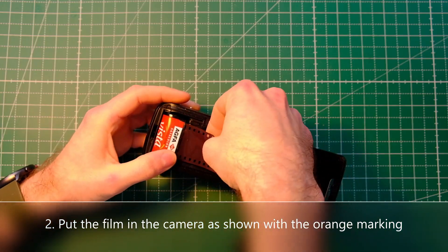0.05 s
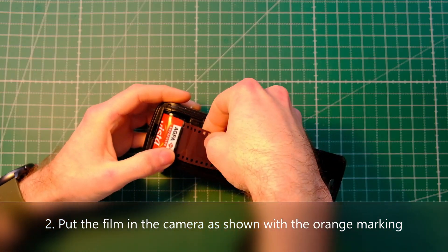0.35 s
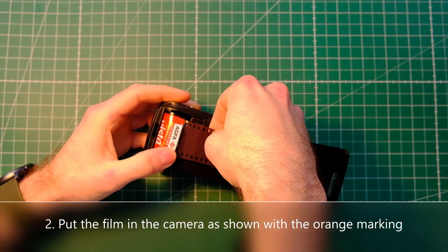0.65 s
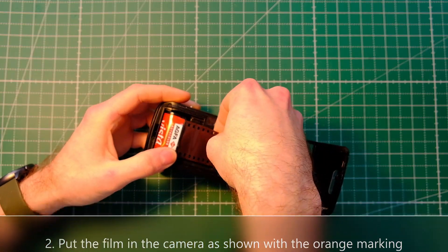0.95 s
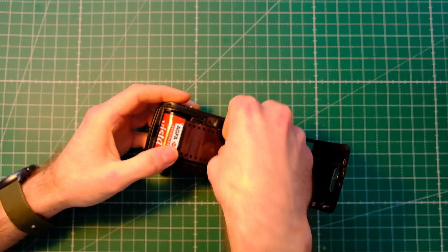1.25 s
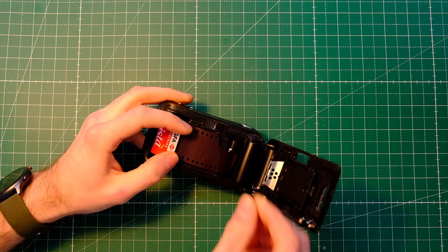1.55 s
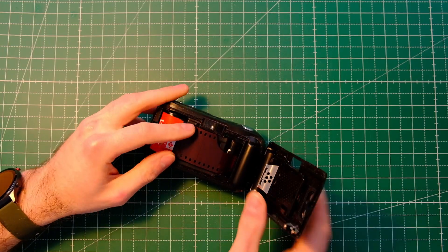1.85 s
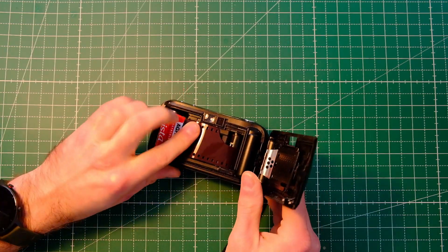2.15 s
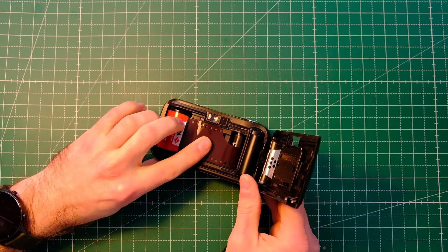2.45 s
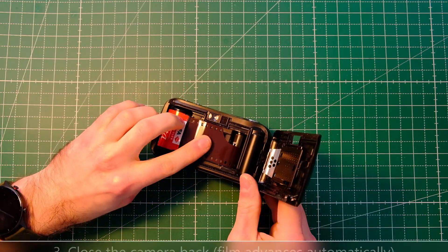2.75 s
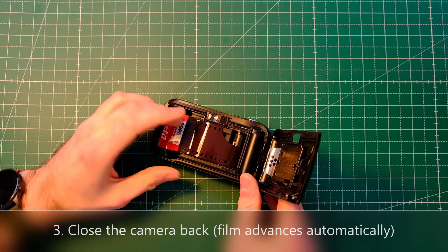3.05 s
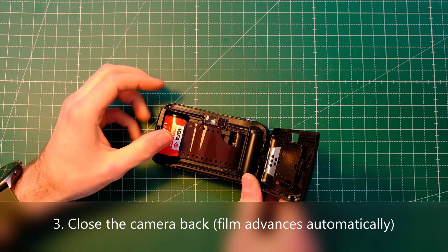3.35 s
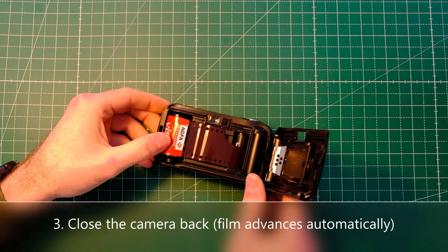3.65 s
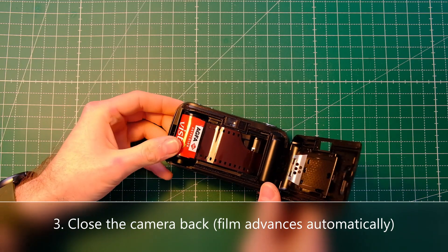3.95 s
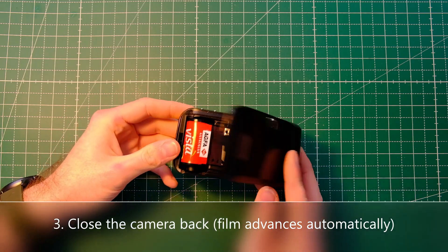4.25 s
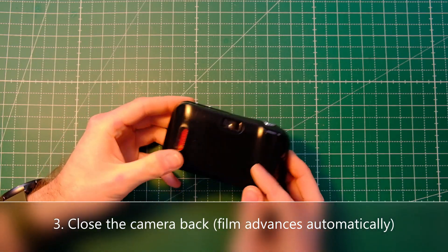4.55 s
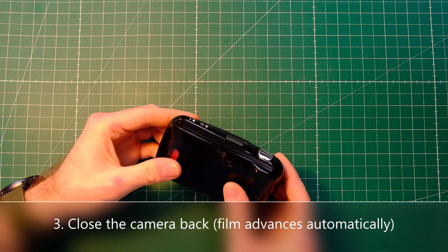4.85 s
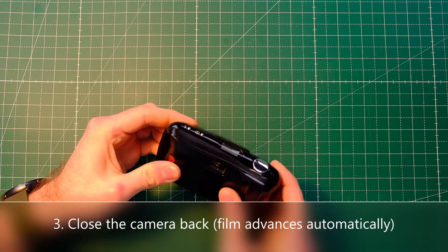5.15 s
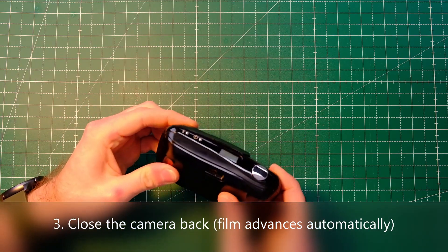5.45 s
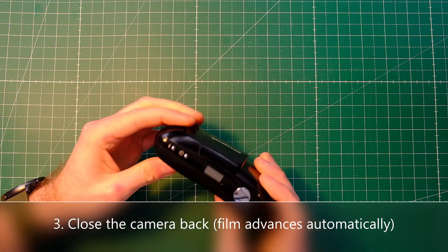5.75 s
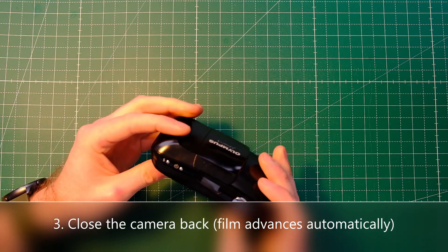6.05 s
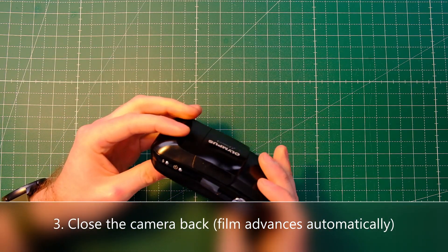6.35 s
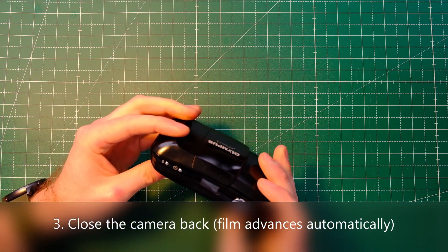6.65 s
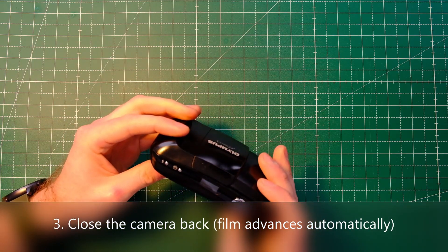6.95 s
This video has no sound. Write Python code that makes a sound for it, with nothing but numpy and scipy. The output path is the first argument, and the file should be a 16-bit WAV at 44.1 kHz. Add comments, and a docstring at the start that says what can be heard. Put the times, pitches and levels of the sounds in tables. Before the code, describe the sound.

Plastic rubs and clicks as film is loaded into a compact camera, then the back snaps shut and a small motor whirs.

```python
"""Over the low rush of a bare room, skin and film rub on plastic and the film clicks into a compact camera.
The body drags, bumps and knocks on a cutting mat, the back swings over and its latch snaps shut.
Sliding friction gives noise; each impact excites damped modes of the shell. A small geared motor then
winds the film on, halts for a moment and runs again, whining at harmonics of its shaft speed while
its meshing teeth rasp. The room reverberates with it all."""
import sys
import numpy as np
from scipy import signal
from scipy.fft import rfft, irfft
from scipy.io import wavfile
from scipy.ndimage import uniform_filter1d

SR = 44100
rng = np.random.default_rng(int(sys.argv[2]) if len(sys.argv) > 2 else 0)


def wav_record(signal):
    """Record a signal, one row per channel, as 16-bit PCM in the file named by sys.argv[1]."""
    frames = np.transpose(np.atleast_2d(signal))
    bounded = np.clip(frames, -1, 1)
    # unit amplitude maps onto the largest positive 16-bit level
    quanta = np.round(bounded * 32767).astype(np.int16)
    wavfile.write(sys.argv[1], SR, quanta)


N = 312669
TIME = np.arange(N) / SR


def amp(db):
    """Amplitude ratio of a level in decibels."""
    return 10 ** (np.asarray(db) / 20)


def unit(x):
    """Normalisation to rms 1."""
    return x / np.sqrt(np.mean(x ** 2) + 1e-20)


def read(points, hz):
    """Interpolation of a table on a log-frequency axis."""
    f, value = np.transpose(points)
    return np.interp(np.log(hz + 1), np.log(f), value)


def add(mix, s, sound):
    """Superposition: a sound joins the mix at time s."""
    part = mix[..., round(s * SR):][..., :sound.shape[-1]]
    part += sound[..., :part.shape[-1]]


def ramp(start, length):
    """Linear rise from 0 to 1 over length seconds."""
    return np.clip((TIME - start) / length, 0, 1)


def decay(t, t60):
    """Exponential damping: 60 dB in t60 seconds."""
    return amp(-60 * t / t60)


def pan(db):
    """Interaural level difference, left minus right, as two gains."""
    return amp([[db / 2], [-db / 2]])


def colour(x, db_at, size=2048):
    """Minimum-phase filter with a gain of db_at(frequency) decibels."""
    log_gain = np.log(amp(db_at(abs(np.fft.fftfreq(size, 1 / SR)))))
    taps = np.fft.ifft(np.exp(np.conj(signal.hilbert(log_gain)))).real
    return signal.oaconvolve(x, taps[(None,) * (x.ndim - 1)], axes=-1)[..., :x.shape[-1]]


def shelves(hz, bass_db, treble_db, bass_hz=650, treble_hz=3200):
    """Spectral tilt in dB: heavy blows add bass, hard edges add treble."""
    return bass_db / (1 + (hz / bass_hz) ** 4) + treble_db * (1 - 1 / (1 + (hz / treble_hz) ** 3))


# Likeness of diffuse sound at left and right: (frequency [Hz], coherence [0-1])
COHERENCE = [(40, 0.35), (150, 0.14), (400, 0.33), (1200, 0.52), (3000, 0.41), (8000, 0.14), (14000, 0.22)]

def diffuse_noise(count):
    """A diffuse field is only partly coherent between two nearby points."""
    a, b = rfft(rng.standard_normal((2, count)))
    coherence = read(COHERENCE, np.fft.rfftfreq(count, 1 / SR))
    mid, side = a * np.sqrt((1 + coherence) / 2), b * np.sqrt((1 - coherence) / 2)
    return irfft(np.array([mid + side, mid - side]), count)


# Background spectrum of the room: (frequency [Hz], level [dB])
AIR = [(15, -51), (25, -20.5), (97, -5), (130, -6), (236, -3.5), (394, -5.5), (503, -10), (545, -7),
       (840, -11), (911, -12), (1100, -13), (1560, -16.5), (3250, -23.5), (16000, -44)]

def room_tone(level_db=-49.5):
    """Stationary broadband noise: a low rush with faint hiss."""
    rush = unit(colour(diffuse_noise(N), lambda f: read(AIR, f), size=8192))
    return amp(level_db) * rush * pan(-0.56)


def friction(length, spectrum, treble_db=0, grain_db=3.5):
    """Sliding friction: many tiny slips of uneven size under a swelling stroke."""
    count = int(length * SR)
    sizes = amp(grain_db * np.repeat(rng.standard_normal(SR // 64), 64)[:count])
    slips = diffuse_noise(SR)[:, :count] * sizes
    return unit(colour(slips, lambda f: read(spectrum, f) + shelves(f, 0, treble_db))) * np.hanning(count)


# Response of the plastic shell: (frequency [Hz], level [dB])
SHELL = [(60, -20), (250, -18.5), (470, 0.5), (750, -2), (1300, 1), (2100, 3.5), (3300, 0.5), (5000, -7.5),
         (8000, -17), (12000, -26.5), (16000, -37)]
# Strokes over the shell, and one brief clack of the winding drive at 6 s: (midpoint [s], duration [s], level
# [dB], treble [dB])
RUBS = [(0.02, 0.068, -48.5, 4), (0.303, 0.047, -40.5, 1), (.63, .045, -43, 9), (0.794, 0.056, -52, 7),
        (0.909, 0.054, -50, -4), (1.172, 0.028, -36, -4), (1.554, 0.092, -49.5, -12), (1.943, 0.13, -55, 7),
        (2.073, 0.23, -48, -4), (2.462, .035, -45.5, -12), (3.088, .16, -58.5, 2), (3.508, 0.15, -62, 21),
        (4.292, 0.079, -48.5, 7), (4.395, 0.011, -25, -2), (5.995, .014, -29.5, 4)]

def rubs():
    """Friction of skin and film on plastic, filtered by the shell, and one brief clack of the winding drive at
    6 s."""
    mix = np.zeros((2, N))
    for s, length, db, treble_db in RUBS:
        add(mix, max(s - length / 2, 0), amp(db) * friction(length, SHELL, treble_db))
    return mix


def strike(db_at, chatter_t60, first_db, chatter_db, wide_hz=3800):
    """Impact: an impulse and brief chatter, filtered by the struck object; the treble spreads in space."""
    t = np.arange(SR // 8) / SR
    mid, side = rng.standard_normal((2, len(t))) * decay(t, chatter_t60)
    side = signal.lfilter(*signal.butter(1, wide_hz, "high", fs=SR), side)
    contact = unit(colour(1. * (t == 0), db_at))
    chatter = unit(colour(np.array([mid + side, mid - side]), db_at))
    return unit(amp(first_db) * contact + amp(chatter_db) * chatter)


def ring(blow, modes):
    """Modal response: a blow excites damped sinusoids (frequency [Hz], level [dB], T60 [s])."""
    t = np.arange(blow.shape[1]) / SR
    response = sum(amp(db) * decay(t, t60) * np.cos(2 * np.pi * hz * t) for hz, db, t60 in modes)
    return unit(signal.fftconvolve(blow.mean(0), response)[:len(t)])


def radiate(source, events, room_db=-7, directions=3):
    """Directivity: blows differ with direction. Returns the direct sound and the paths into the room."""
    direct, paths = np.zeros((2, N)), np.zeros((directions, N))
    for s, db, *shape in events:
        add(direct, s, amp(db) * source(*shape))
        for path in paths:
            add(path, s, amp(db + room_db) * unit(source(*shape)[0]) / np.sqrt(directions))
    return direct, paths


# Modes of the camera body: (frequency [Hz], level [dB], T60 [s])
BODY_MODES = [(471, -14, 0.053), (1010, -6, 0.011), (1320, 2.5, 0.022), (1814, -3, 0.04), (2072, -1, 0.02),
              (2400, -19, 0.032), (3100, -10, 0.039), (3400, 3, 0.0036), (4310, 3, 0.01),
              (5220, 5.5, 0.011), (7350, -2, 0.013)]

def click(bass_db, treble_db, ring_hz, ring_db, chatter_t60, ring_t60=0.018, body_db=-5):
    """A hard impact excites the shell, the body's modes and the resonance of the struck part."""
    blow = strike(lambda f: read(SHELL, f), chatter_t60, first_db=-11.5, chatter_db=-3.5)
    blow = blow + amp(body_db) * ring(blow, BODY_MODES)
    blow = unit(colour(blow, lambda f: shelves(f, bass_db, treble_db)))
    return unit(blow + amp(ring_db) * ring(blow, [(ring_hz, 0, ring_t60)]))


# Hard contacts: (time [s], level [dB], bass [dB], treble [dB], ring [Hz], ring [dB], chatter T60 [s])
CLICKS = [(.1425, -47.5, -21, -4.5, 2050, -11, 0.099), (0.2179, -34.5, 1, -7.5, 1340, -14, 0.019),
          (0.2758, -47, -4, -8, 1330, -13, 0.016), (.3652, -35, 3, -7.5, 2150, -22, .028),
          (.3880, -37.5, 4, 20, 3400, 9, 0.019), (.3903, -31, -8, 15, 1230, -7.5, .011),
          (.5270, -52.5, -11, 11, 3400, 1, 0.023), (1.1770, -33, 3.5, 13.5, 3100, -9, .016),
          (1.1790, -29.5, -2, -1, 1860, 4, .022), (1.632, -52.5, 26, 1, 1410, 2, 0.019),
          (1.700, -51, 6, 2, 1270, -1, 0.055), (1.7202, -44.5, 11, 8, 2030, -36, 0.11),
          (2.112, -35.5, -12, -14, 3020, -6, 0.016), (2.477, -53.5, -1, -11, 1270, 0, 0.032),
          (2.8750, -65, -9, 7, 3100, -16, 0.053), (4.3965, -37.5, 19, 2, 1330, 13, 0.062),
          (4.8190, -55, 10, -7, 860, -3, .025), (5.0234, -49.5, 4, -2.5, 2400, -9, 0.011),
          (6.642, -45.5, -3, -28, 2055, -3, 0.05), (7.018, -41.5, -17, -4, 2030, 15, 0.018)]

def clicks():
    """Impacts of plastic on plastic radiate as short transients."""
    return radiate(click, CLICKS)


# Spectrum of the body sliding on the mat: (frequency [Hz], level [dB])
DRAG_TONE = [(100, -34), (450, -22), (700, 1), (950, 0), (1400, -11.5), (2500, -25.5), (8000, -34.5)]
# Slides on the mat: (midpoint [s], duration [s], level [dB])
DRAGS = [(0.591, 0.057, -49.5), (1.61, 0.2, -52.5), (1.888, .14, -49), (3.497, .14, -48.5),
         (5.988, 0.055, -40.5)]

def drags():
    """Friction of the body on the mat gives a band of midrange noise."""
    mix = np.zeros((2, N))
    for s, length, db in DRAGS:
        add(mix, s - length / 2, amp(db) * friction(length, DRAG_TONE))
    return mix


# Fingers and body meeting the mat: (time [s], level [dB], frequency [Hz])
BUMPS = [(0.769, -56, 735), (.8925, -61, 920), (1.5126, -54, 856), (3.3032, -53.5, 754),
         (5.0495, -56.5, 430)]

def bumps(t60=0.035, puff_db=2):
    """A cushioned impact excites one low, heavily damped mode and a dull puff."""
    mix = np.zeros((2, N))
    t = np.arange(SR // 8) / SR
    band = signal.butter(2, [130, 1300], "band", fs=SR)
    for s, db, hz in BUMPS:
        puff = amp(puff_db) * unit(signal.lfilter(*band, diffuse_noise(len(t))))
        mode = np.sin(2 * np.pi * hz * t)
        add(mix, s, amp(db) * unit(decay(t, t60) * (mode + puff)))
    return mix


# Response of the hollow body: (frequency [Hz], level [dB])
HOLLOW = [(60, -5), (150, -3.5), (320, -1.5), (500, -7), (750, -6.5), (1000, -8), (1350, -5), (2000, -8),
          (2600, -16), (3700, -14), (7000, -27), (15000, -36.5)]

def knock(cutoff_hz, treble_db, ring_hz, ring_db, chatter_t60, ring_t60=0.013):
    """Impact on a hollow body: the heavier it lands, the lower its spectrum reaches."""
    def spectrum(f):
        bass_loss_db = 10 * np.log10(1 + (cutoff_hz / (f + 10)) ** 4)
        return read(HOLLOW, f) + shelves(f, 0, treble_db) - bass_loss_db
    blow = strike(spectrum, chatter_t60, first_db=0, chatter_db=-1)
    return unit(blow + amp(ring_db) * ring(blow, [(ring_hz, 0, ring_t60)]))


# Dull blows: (time [s], level [dB], low cutoff [Hz], treble [dB], ring [Hz], ring [dB], chatter T60 [s])
KNOCKS = [(2.1122, -26.5, 130, -8.5, 890, -2, 0.013), (4.3985, -25.5, 282, 1.5, 624, -5, .036),
          (4.638, -34.5, 607, -3, 860, 7, 0.058), (4.684, -45.5, 610, -14, 970, 11, .02)]

def knocks():
    """Impact and rebound: the body knocks on the mat, then the back lands on it and bounces."""
    return radiate(knock, KNOCKS)


def latch(time_s=5.1065, level_db=-24, drop_s=0.00127, hit_db=-3):
    """Double impact: the hook hits its catch, then drops home and sets its spring ringing."""
    def snap():
        hit = amp(hit_db) * click(bass_db=-8, treble_db=-6.5, ring_hz=1120, ring_db=-21, chatter_t60=0.011)
        home = click(bass_db=3.5, treble_db=16, ring_hz=1539, ring_db=-9.5, chatter_t60=0.011, ring_t60=0.15)
        add(hit, drop_s, home)
        return unit(hit)
    return radiate(snap, [(time_s, level_db)], room_db=-2.5)


# Runs of the motor: (start [s], stop [s], time for the gears to engage [s])
RUNS = [(5.201, 6.527, 0.25), (6.63, 7.2, 0.035)]
# Running speed of the shaft, one list per run: (time [s], speed [turns/s])
SPEEDS = [
    [(5.42, 182.4), (5.516, 178.9), (5.75, 177.6), (5.802, 180.7), (6.032, 180.3), (6.102, 184.5),
     (6.222, 186.0), (6.244, 184.0), (6.5, 188.4)],
    [(6.8, 183.3), (6.816, 184.1), (7.05, 187.4)],
]

def drive(spin_up_s=0.033, grind_s=0.017, halt_s=0.00402):
    """First-order spin-up, then a grinding halt: speed [turns/s], engagement [0-1], grinding [0-1]."""
    speed, engaged, grinding = np.zeros((3, N))
    for (start, stop, engage_s), running in zip(RUNS, SPEEDS):
        on = 1 - ramp(stop, halt_s)
        spin_up = 1 - np.exp(-np.maximum(TIME - start, 0) / spin_up_s)
        speed += on * spin_up * np.interp(TIME, *np.transpose(running))
        engaged += on * ramp(start, engage_s)
        grinding += on * ramp(stop - grind_s, halt_s)
    return speed, engaged, grinding


def by_load(load, free_db, loaded_db):
    """Gain interpolated in decibels between free running and full load."""
    return amp(free_db + load * (loaded_db - free_db))


# Shaft harmonics: (order [per turn], relative level running free [dB], relative level loaded [dB])
WHINE = [(3, -21, -24), (5, -22, -19), (6, -18, -11.5), (7, -20, -29), (8, -26, -24), (9, -14.5, -13.5),
         (10, -18, -15), (11, -19, -10), (12, -20.5, -17), (13, -17, -22), (17, -48, -13)]

def shaft_whine(angle, load, swell_db=3.5, swells_per_s=14):
    """Periodic rotation gives harmonics of the shaft speed; each swells and sinks on its own."""
    whine = np.zeros(N)
    for order, free_db, loaded_db in WHINE:
        drift = np.interp(TIME * swells_per_s, np.arange(256), rng.standard_normal(256))
        gain = by_load(load, free_db, loaded_db) * unit(amp(swell_db * drift))
        whine += gain * np.sin(order * angle + 2 * np.pi * rng.random())
    return whine


# Mesh harmonics of the ten-tooth pinion: (order [per turn], relative level [dB])
PINION_ORDERS = [(20, 2), (30, -2.5), (40, -12.5)]

def pinion_whistle(angle, speed, uneven, play, play_rad=1.03, waver=0.31, slack_db=-15, taut_db=-22.5):
    """Mesh tones, phase-modulated by backlash, sweep through a case resonance during spin-up."""
    case_hz, half_width_hz, case_db = 3020, 210, 22
    whistle = np.zeros(N)
    for order, db in PINION_ORDERS:
        resonance_db = case_db / (1 + ((order * speed - case_hz) / half_width_hz) ** 2)
        whistle += amp(db + resonance_db) * np.sin(order * angle + play_rad * play)
    tautness = ramp(start=5.67, length=0.22)  # the whistle weakens as the film tightens
    return whistle * unit(1 + waver * uneven) * by_load(tautness, slack_db, taut_db)


# Gear noise running free and under load: (frequency [Hz], level [dB])
GEARS_FREE = [(150, -33), (500, -8), (1000, -8), (1350, -18), (1750, -1.5), (2200, -0.5), (2800, -7.5),
              (3300, -1), (3600, -18), (3900, -6), (4800, -11.5), (5500, -10.5), (6600, -15.5),
              (15500, -38.5)]
GEARS_LOADED = [(150, -23), (450, -21), (800, -8), (1100, -7), (1400, -12), (1750, -6), (2080, 3),
                (2550, -7), (3250, -5), (3900, -13), (5700, -22), (6600, -29), (10000, -30), (15500, -63)]

def gear_rasp(angle, load, uneven, tooth_depth=0.28, turn_depth=0.049, uneven_db=0.7):
    """Amplitude-modulated friction: each tooth scrapes as it meshes, harder on one side of every turn."""
    mesh = (1 + tooth_depth * np.cos(10 * angle)) * (1 + turn_depth * np.cos(angle))
    scrape = diffuse_noise(N) * mesh * amp(uneven_db * uneven)
    free = unit(colour(scrape, lambda f: read(GEARS_FREE, f)))
    loaded = unit(colour(scrape, lambda f: read(GEARS_LOADED, f)))
    return np.sqrt(1 - load) * free + np.sqrt(load) * loaded


def jitter():
    """Low-pass noise: a random fluctuation of rms 1."""
    return unit(uniform_filter1d(uniform_filter1d(rng.standard_normal(N), size=300), size=200))


def motor(taut_s=5.75, take_up_s=0.032, taut_load=0.84, flutter=0.003, whine_db=1, gears_db=-2, grind_db=7):
    """Machine noise depends on load: as the film pulls taut, the drive grows louder and changes timbre."""
    speed, engaged, grinding = drive()
    load = taut_load * (1 + np.tanh((TIME - taut_s) / take_up_s)) / 2
    wobble, uneven, play = jitter(), jitter(), jitter()
    angle = 2 * np.pi * np.cumsum(speed * (1 + flutter * wobble)) / SR
    tones = amp(whine_db) * shaft_whine(angle, load) + pinion_whistle(angle, speed, uneven, play)
    tones *= np.sqrt(2) * (speed / speed.max()) ** 2  # the tones grow with speed
    gears = amp(gears_db + grind_db * grinding) * gear_rasp(angle, load, uneven)
    return by_load(load, free_db=-38.5, loaded_db=-33.5) * engaged * (tones + gears)


# Reverberation time: (frequency [Hz], T60 [s])
ROOM_T60 = [(150, 0.63), (500, 0.56), (1500, 0.71), (4000, 0.59), (8000, 0.56), (14000, 0.39)]
# Colour of the reflections: (frequency [Hz], level [dB])
ROOM_COLOUR = [(100, -2), (500, 4.5), (1500, 0), (3500, -4.5), (8000, -2), (15000, -1.5)]

def reverberation(x, build_s=0.0073):
    """Dense reflections build up, then decay exponentially at each band's own rate."""
    t = np.arange(SR) / SR
    reflections = diffuse_noise(SR) * (1 - np.exp(-(t / build_s) ** 2))
    hz, times, bands = signal.stft(reflections, SR, nperseg=256)
    tail = signal.istft(bands * decay(times, read(ROOM_T60, hz)[:, None]), SR, nperseg=256)[1]
    tail = colour(tail / np.linalg.norm(tail[0]), lambda f: read(ROOM_COLOUR, f))
    return signal.fftconvolve(x[None], tail, axes=1)[:, :N]


def scene(soft_room_db=-2, motor_room_db=-7):
    """The direct sound of hands and motor superposes on the reverberant field and the room tone."""
    soft = rubs() + drags() + bumps()
    blows, paths = map(sum, zip(clicks(), knocks(), latch()))
    paths[0] += amp(soft_room_db) * soft.mean(0)
    winding = motor()
    echoes = sum(reverberation(path) for path in paths)
    echoes += amp(motor_room_db) * reverberation(winding.mean(0))
    return blows * pan(-3.5) + (soft + winding) * pan(-2.5) + echoes * pan(-3) + room_tone()


def record(dry, dip_s=2.297, fall_s=0.036, rise_s=0.029, dip_db=-29, ceiling=0.65, cutoff_hz=15900):
    """The level dips briefly, soft saturation rounds the peaks and a low-pass filter limits the band."""
    fade = 1 - ramp(dip_s - fall_s, fall_s) + ramp(dip_s, rise_s)
    dipped = dry * np.maximum(fade ** 2, amp(dip_db))
    limited = dipped / (1 + (dipped / ceiling) ** 6) ** (1 / 6)
    low_pass = signal.firwin(255, cutoff_hz, window=("kaiser", 9), fs=SR)
    return signal.oaconvolve(limited, low_pass[None], "same")


dry = scene()
out = record(dry)
wav_record(out)
```